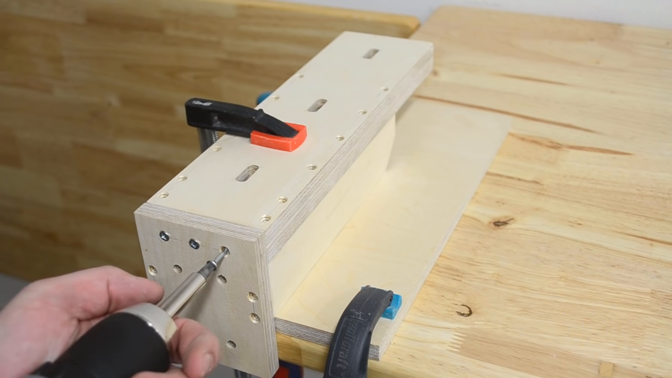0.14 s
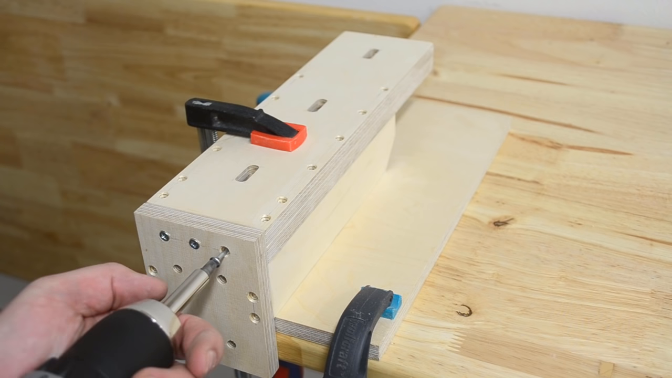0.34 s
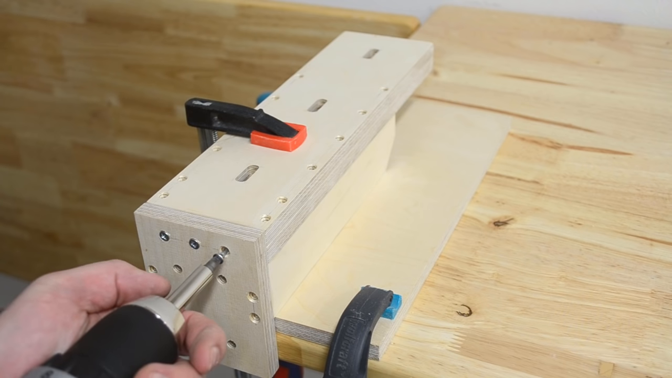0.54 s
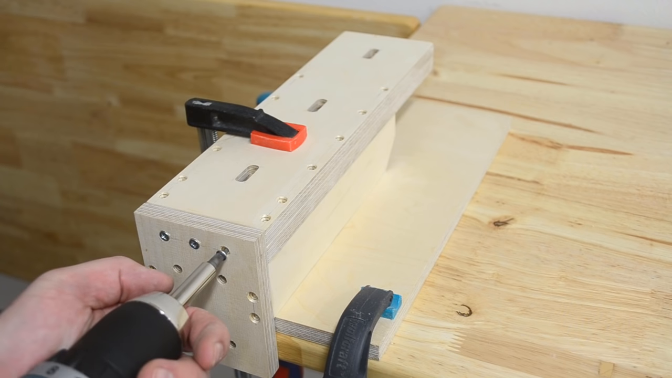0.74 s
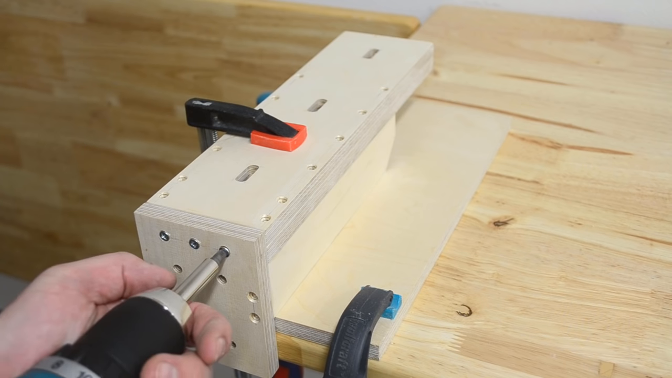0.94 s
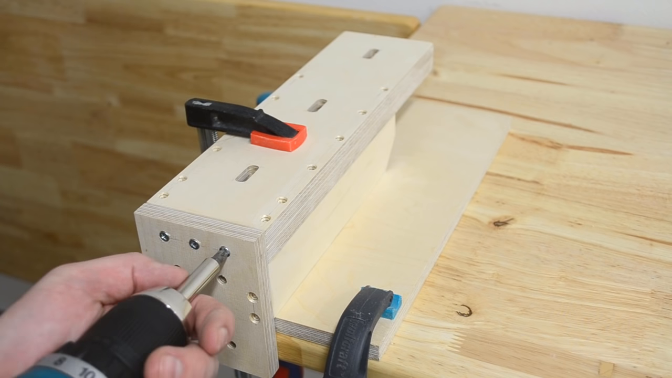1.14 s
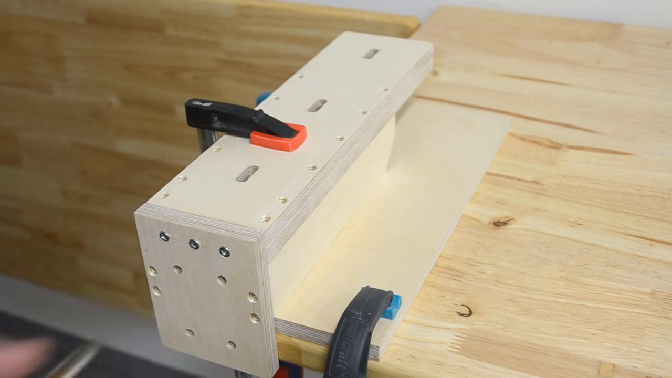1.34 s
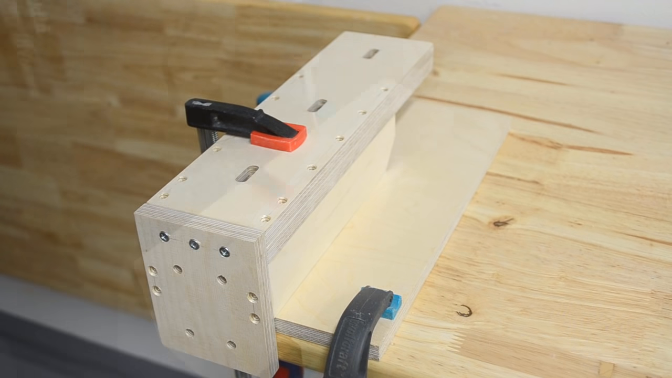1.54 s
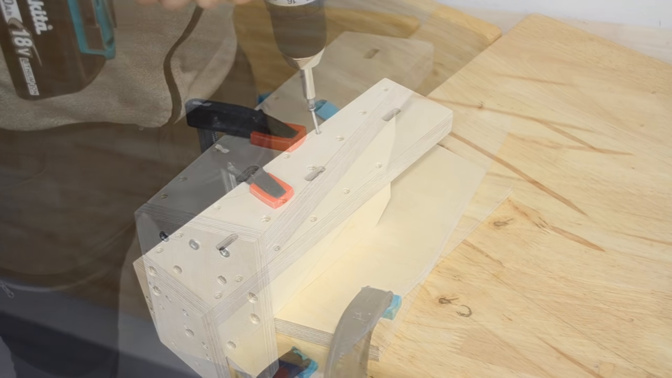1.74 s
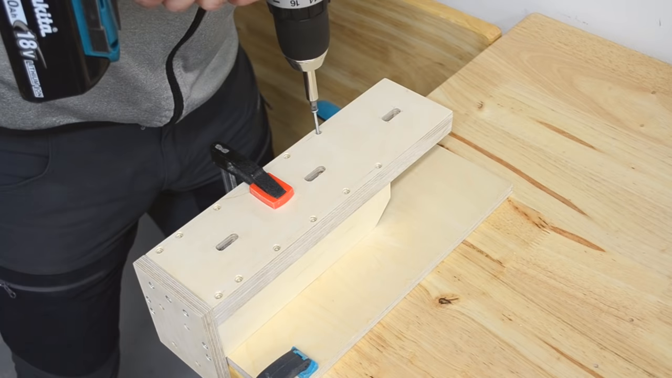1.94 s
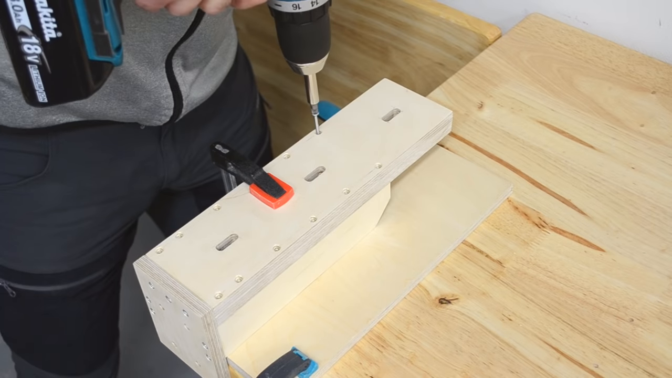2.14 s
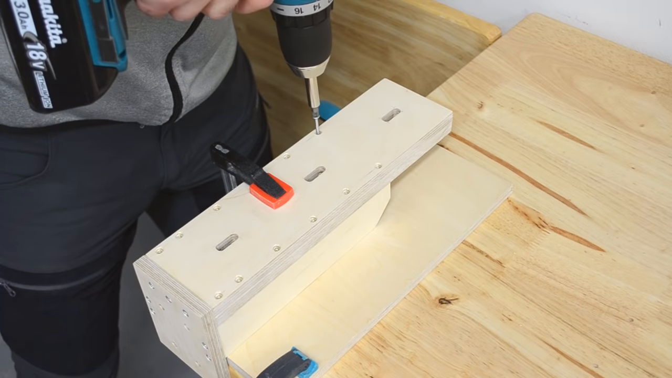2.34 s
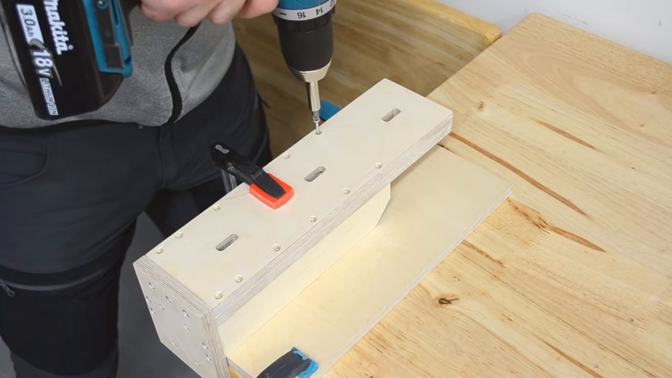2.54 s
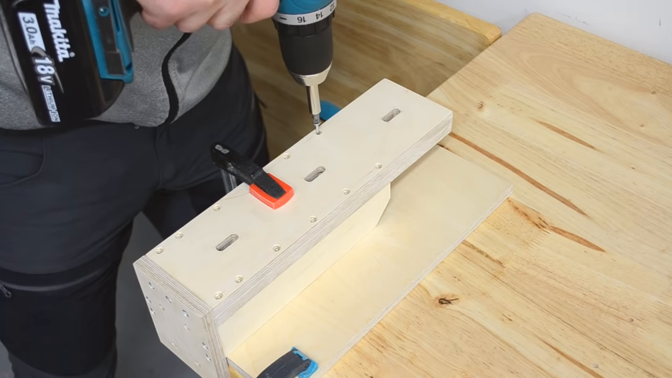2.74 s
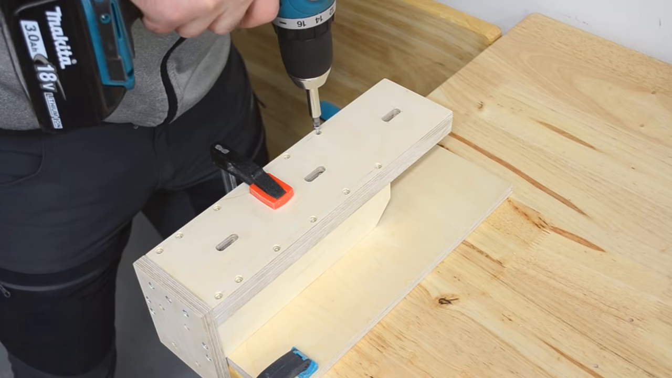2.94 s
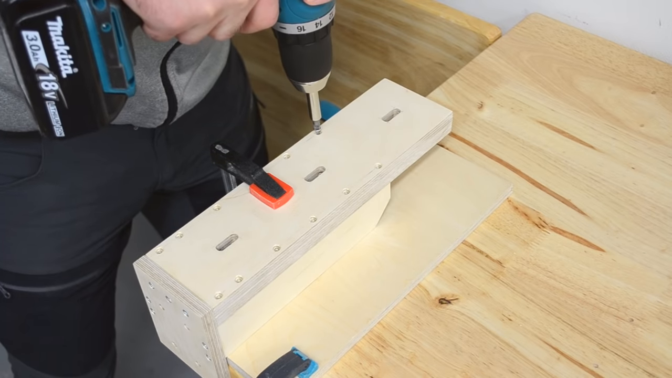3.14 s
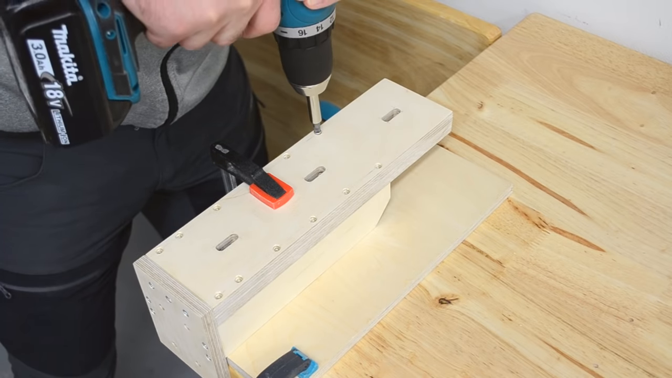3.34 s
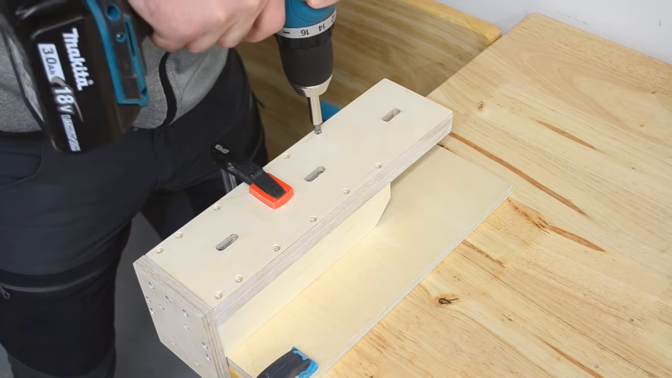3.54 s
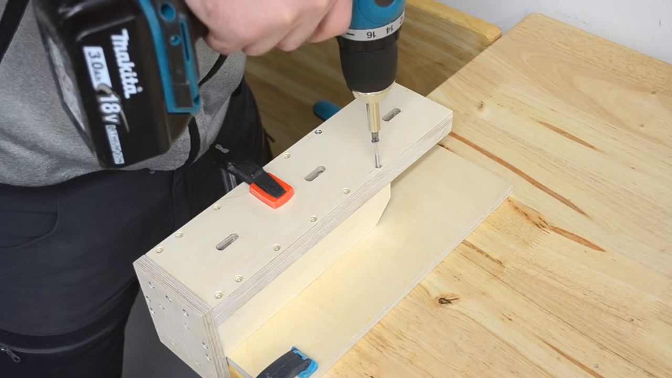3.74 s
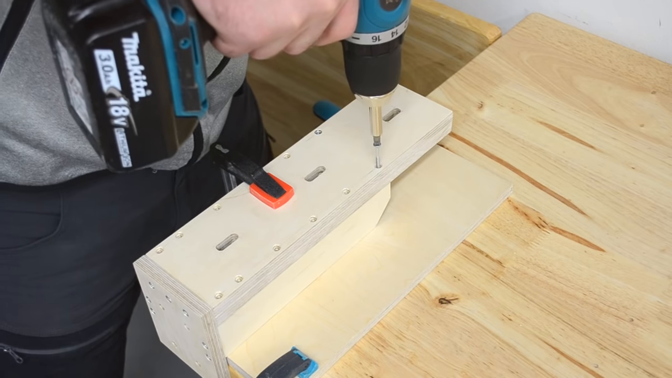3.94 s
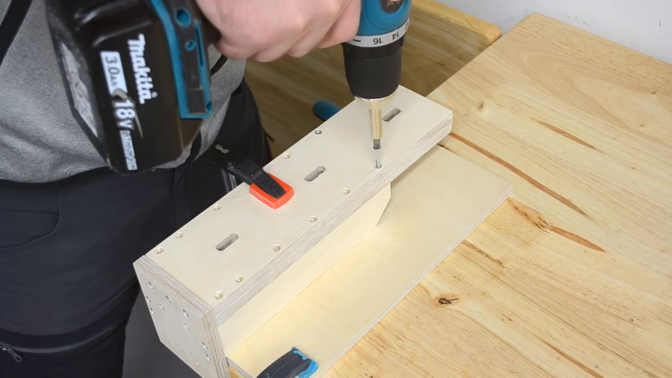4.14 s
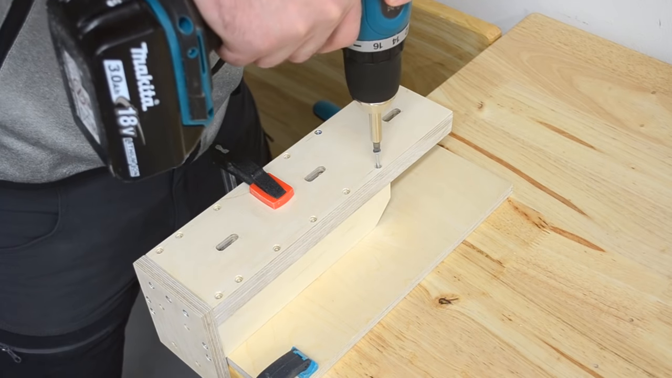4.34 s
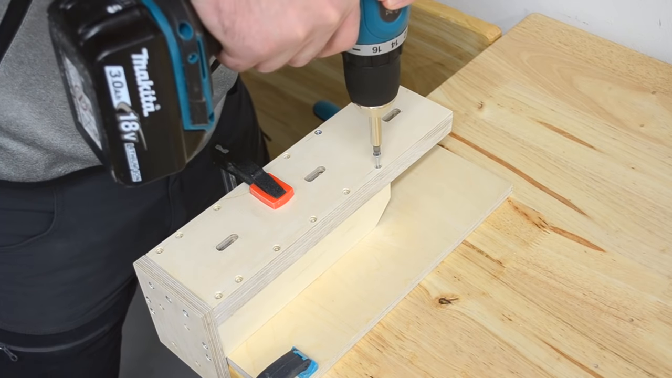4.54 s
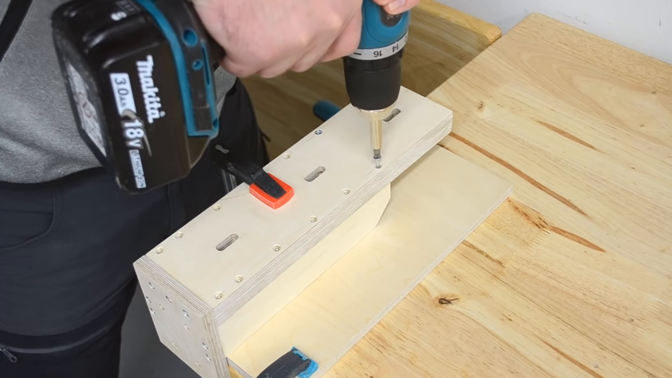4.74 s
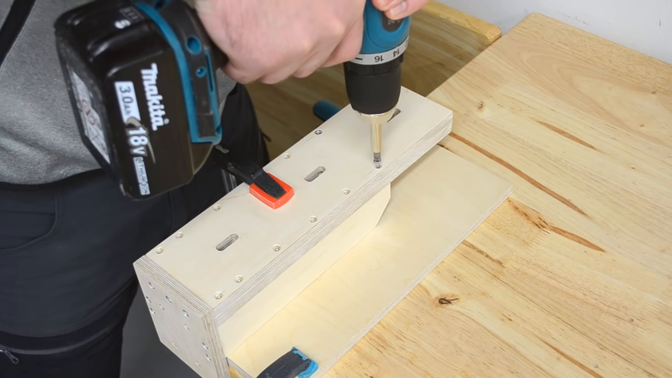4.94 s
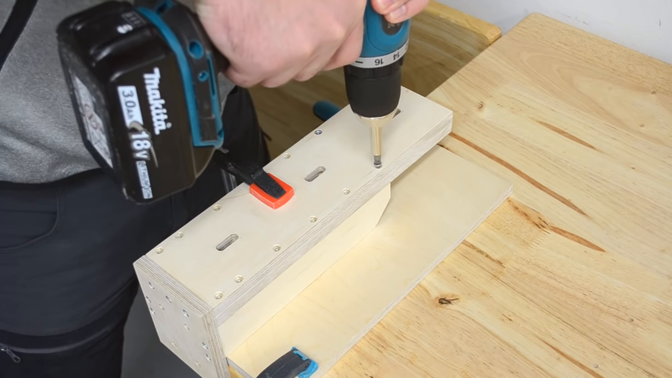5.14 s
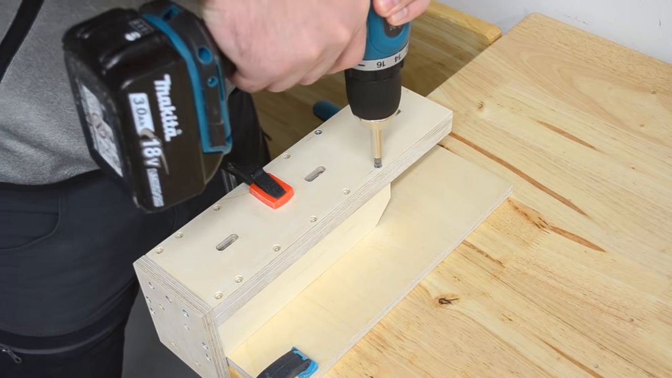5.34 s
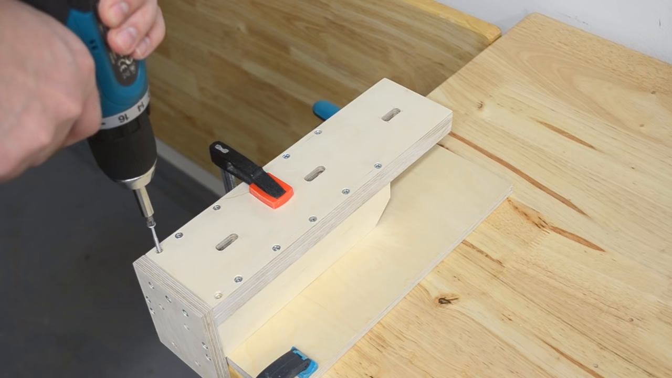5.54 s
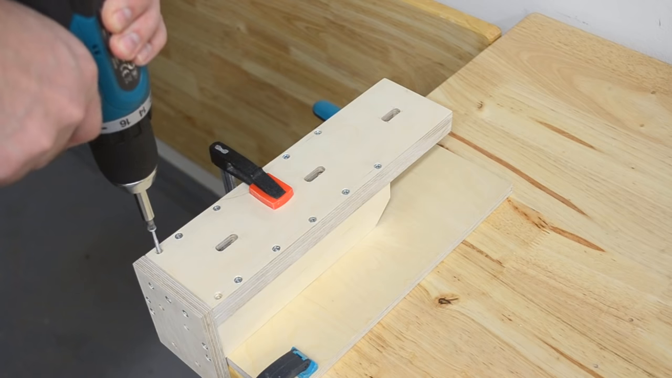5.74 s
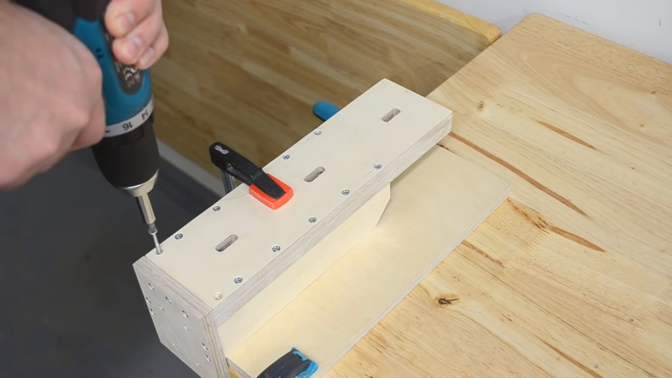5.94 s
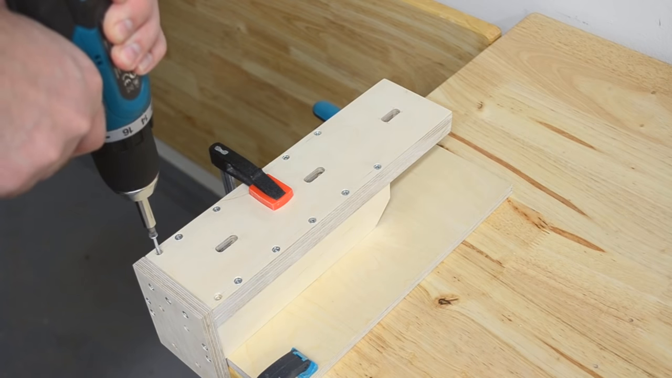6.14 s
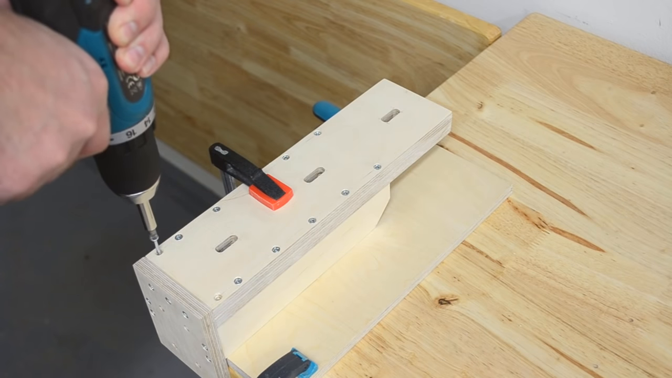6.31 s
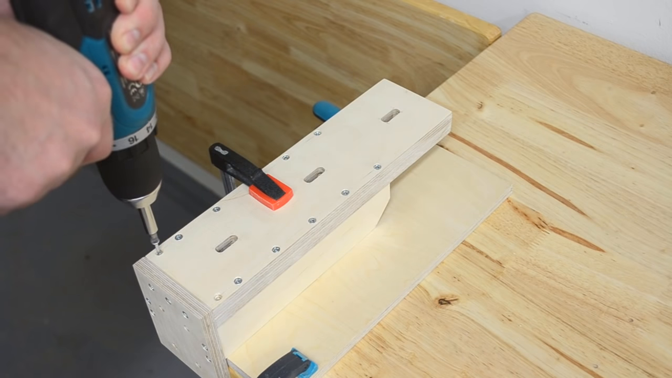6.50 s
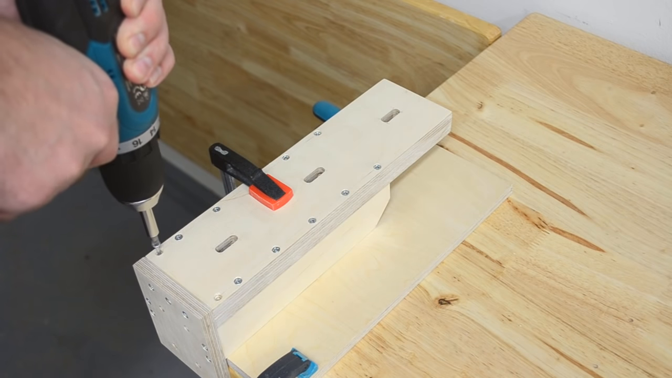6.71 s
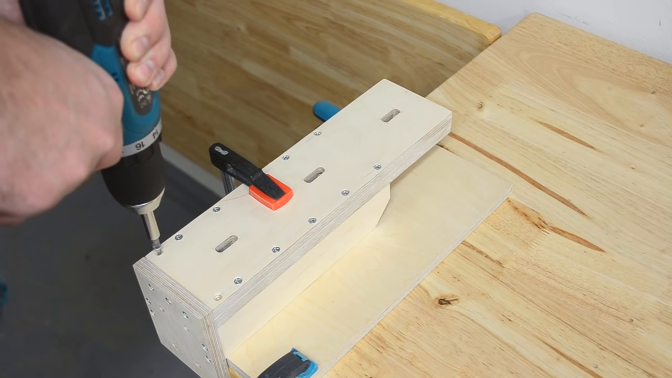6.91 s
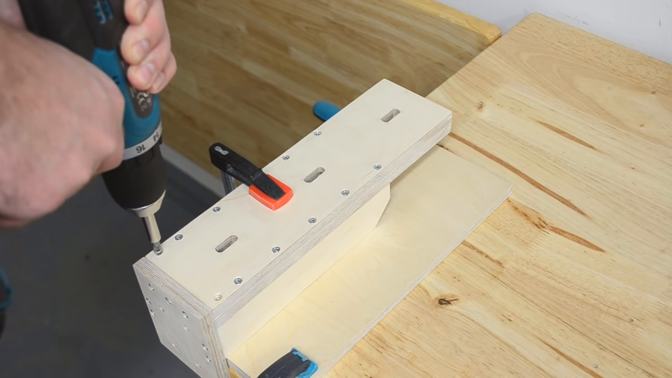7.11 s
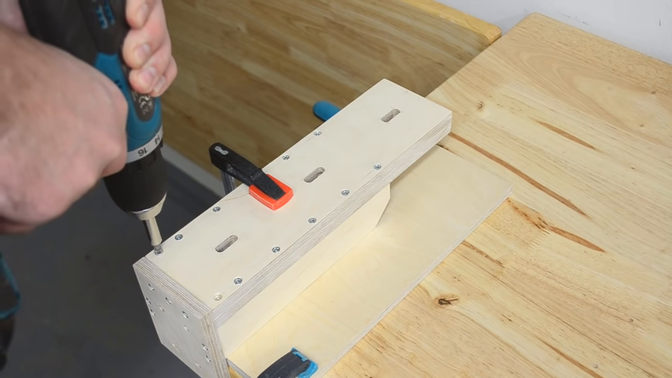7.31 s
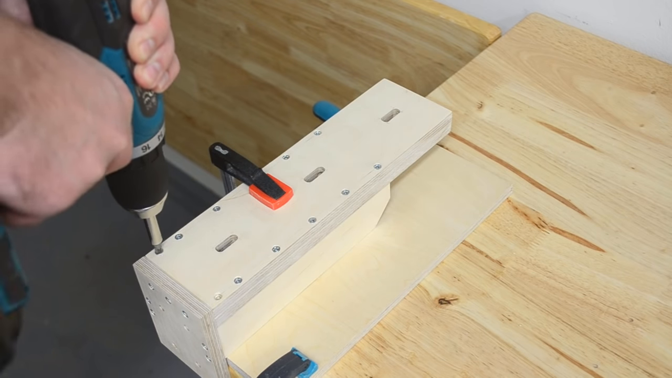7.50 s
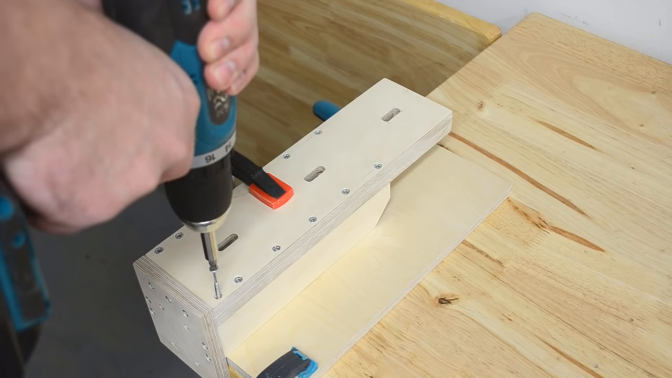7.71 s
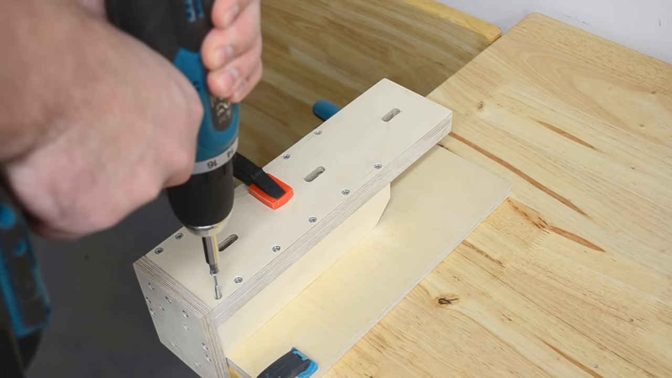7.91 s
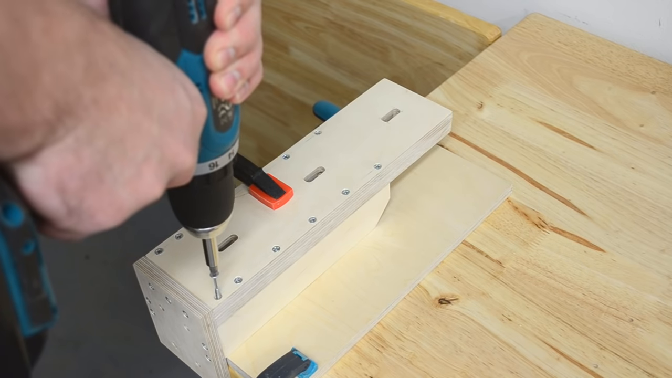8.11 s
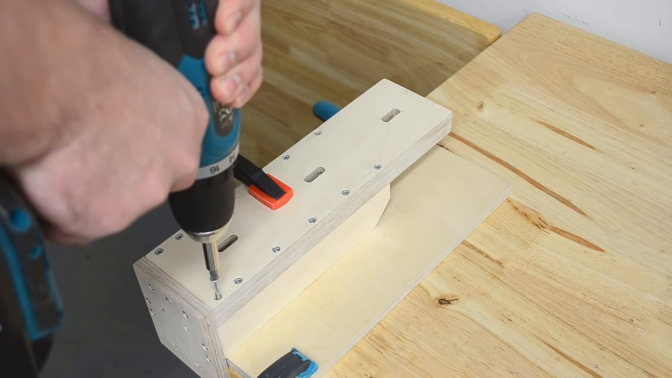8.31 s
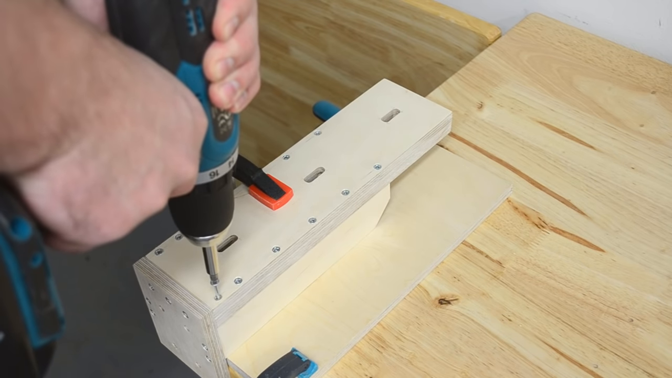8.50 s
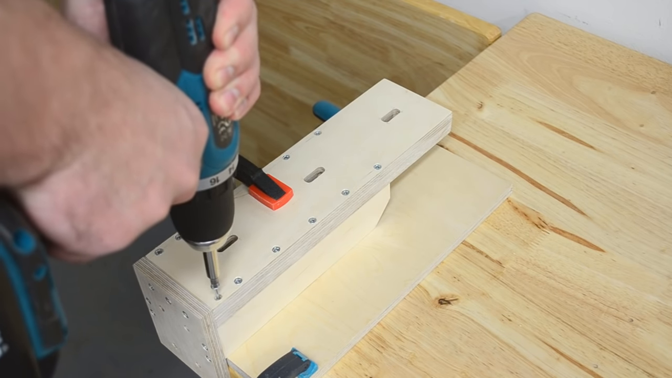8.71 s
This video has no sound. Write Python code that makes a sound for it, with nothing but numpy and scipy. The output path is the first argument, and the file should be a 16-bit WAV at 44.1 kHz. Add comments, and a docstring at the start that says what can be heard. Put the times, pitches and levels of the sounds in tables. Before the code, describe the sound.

Close drill bursts in a small workshop: gritty gear whine sagging under load, quick clacking clutch, short pauses and faint ticks of the bit.

```python
"""Cordless drill in a small workshop

From a metre away, in mono: five screws go into a clamped plywood box, the first already turning, the last cut off.
Noise gives the gear rattle and sines on multiples of the shaft speed give the whines; the speed sags under load.
Four drives end in clutch ratcheting, built of cracks and struck modes, before the drill stops.
Light ticks of handling fall in the first pause and in three later drives; the room adds a short tail over faint hiss."""
import sys
import numpy as np
from scipy import signal
from scipy.fft import rfft, irfft, next_fast_len
from scipy.io import wavfile
from scipy.ndimage import uniform_filter1d

SR = 44100
rng = np.random.default_rng(int(sys.argv[2]) if len(sys.argv) > 2 else 0)


def transcribe(signal):
    """Save signal, clipped to [-1, 1], as a 16-bit WAV file at the path in sys.argv[1]."""
    frames = np.atleast_2d(signal).T
    limited = np.clip(frames, -1, 1)
    pcm = np.round(limited * 32767).astype(np.int16)
    wavfile.write(sys.argv[1], SR, pcm)


N = 386316
TIME = np.arange(N) / SR
# clutch slips, in bursts for screws 1-4: [slip_s, crack_peak_db, ring_gain_db, knock_gain_db]
CLUTCH_SLIPS = [
    [(1.0349, -28, -39, -44), (1.0459, -30, -37, -44), (1.0562, -24, -37, -46), (1.0677, -25, -39, -46),
     (1.0722, -29, -46, -52), (1.0797, -27, -39, -47), (1.0911, -25, -39, -47), (1.1026, -25, -39, -47),
     (1.1151, -29, -39, -47), (1.1293, -29, -38, -46)],
    [(3.5169, -23, -38, -36), (3.5315, -24, -36, -38), (3.5489, -27, -35, -40), (3.57, -27, -35, -41),
     (3.5954, -31, -36, -43), (3.6383, -28.5, -38, -47)],
    [(5.4005, -25, -36, -37), (5.4112, -24, -36, -39), (5.4216, -26, -35, -41), (5.4321, -24, -34, -41),
     (5.4431, -24, -33, -39), (5.4553, -28, -33, -39)],
    [(7.4038, -25, -35, -39), (7.4183, -24, -36, -41), (7.4336, -27, -34, -42), (7.4507, -29, -33, -42),
     (7.4669, -28, -32, -43), (7.4873, -27, -32, -44), (7.5117, -28, -35, -46), (7.5507, -28, -33, -45)],
]


def undb(db):
    """Decibels to gain."""
    return 10 ** (np.asarray(db) / 20)


def level(x, db):
    """Scale to an rms level."""
    return x * undb(db) / np.sqrt(np.mean(x ** 2))


def spectrum_db(hz, table):
    """Read a (Hz, dB) spectrum; it falls 12 dB per octave under its first point."""
    at_hz, db = np.transpose(table)
    octaves_under = np.log2(np.maximum(at_hz[0] / hz, 1))
    return np.interp(np.log(hz), np.log(at_hz), db) - 12 * octaves_under


def lift_db(hz, lifts):
    """Summed lift of (Hz, width Hz, dB) resonances."""
    return sum(db / (1 + (2 * (hz - f) / w) ** 2) for f, w, db in lifts)


def colour(x, table, lifts=()):
    """Shape by a (Hz, dB) spectrum, lifted at (Hz, width Hz, dB) resonances."""
    size = next_fast_len(len(x))
    hz = np.maximum(np.arange(size // 2 + 1) * SR / size, 1)
    gain = undb(spectrum_db(hz, table) + lift_db(hz, lifts))
    return irfft(rfft(x, size) * gain, size)[:len(x)]


def walk(rate, size):
    """Random levels held 1 / rate s and slewed twice; spread near 1."""
    k = int(SR / rate)
    steps = np.repeat(rng.standard_normal(size // k + 1), k)
    return 1.2 * uniform_filter1d(uniform_filter1d(steps, k), k)[:size]


def column(table, k):
    """Leading columns of each row, with entry k of its last five."""
    return [(*row[:-5], row[k - 5]) for row in table]


def shop():
    """Faint workshop hiss: coloured noise, slowly wavering in level."""
    # hiss of the workshop: [frequency_hz, density_db_per_hz]
    hiss_spectrum = [(24, -49), (40, -6), (524, -7), (666, -5), (1960, -4), (12500, -7), (13200, -35)]
    hiss = level(colour(rng.standard_normal(N), hiss_spectrum), -86.5)
    return hiss * undb(walk(1.7, N))


def room(x):
    """Near walls: a short noisy tail, duller as it fades."""
    tail_db, dull_t60_s, bright_decay_s = -9, 0.16, 0.085
    t = TIME[:SR // 2]
    tail = rng.standard_normal(len(t)) * 1000. ** (-t / dull_t60_s) * (t > .004)
    dull = signal.lfilter([.5], [1, -.5], tail)
    # the unfiltered part dies sooner
    tail = tail * np.exp(-t / bright_decay_s) + dull
    unit_tail = tail / np.sqrt(np.sum(tail ** 2))
    return x + undb(tail_db) * signal.fftconvolve(x, unit_tail)[:N]


def ringing(table, t):
    """Modes (Hz, t60 s, dB) struck at once, each a little different every time."""
    out = 0
    for f, t60, db in table:
        gain = undb(db + 1.5 * rng.standard_normal())
        out = out + gain * np.sin(2 * np.pi * (f * t + rng.random())) * 1000. ** (-t / t60)
    return out


def blow(crack_db, ring_db, knock_db, k):
    """A sharp crack, the ringing housing with its dense tail, the knock of the box and a dull jolt of the bench."""
    # modes of the clutch housing: [frequency_hz, t60_s, burst_1_db .. burst_4_db, ticks_db]
    housing_modes = [(2885, .1, -6, -10, -5, -12, -8), (3014, .09, -9, -3, -8, -11, -9),
                     (3145, .09, -5, -8, -5, -7, -10), (3330, .12, -11, -9, -7, -7, -7),
                     (3610, .1, -10, -10, -5, -8, -9), (3800, .08, -10, -12, -8, -4, -9),
                     (3930, .09, -6, -10, -7, -8, -4), (4095, .11, -9, -4, -4, -9, -12),
                     (4790, .1, -10, -8, -10, -14, -14)]
    # modes of the box under a blow: [frequency_hz, t60_s, burst_1_db .. burst_4_db, ticks_db]
    box_modes = [(428, .17, -15, -22, -22, -22, -20), (516, .12, -20, -16, -16, -18, -20),
                 (818, .1, -16, -8, -4, -14, -14), (965, .12, -9, -8, -10, -6, -14),
                 (1240, .17, -13, -6, -8, -8, 2), (1400, .12, -4, 0, 0, -6, -12),
                 (1636, .11, -8, -2, -4, -2, -14), (1970, .1, -6, -8, -5, 0, -12),
                 (2075, .12, -3, -12, -12, -8, -14), (2300, .09, -2, -6, -10, 0, -12)]
    t = TIME[:SR // 3]
    crack = colour(rng.standard_normal(len(t)), [(2000, -9), (4000, -3), (15000, -8)]) * np.exp(-t / .0012)
    dense_spectrum = [(300, -24), (800, -17), (1500, -10), (2400, -12), (3000, 1.5), (4200, 0.5),
                      (5000, -7.5), (15000, -19.5)]  # Hz, dB
    dense = level(colour(rng.standard_normal(len(t)), dense_spectrum), -6.5) * 1000. ** (-t / 0.13)
    jolt = np.sin(2 * np.pi * 45 * t) * np.exp(-t / 0.0054)
    ring = 0.3 * ringing(column(housing_modes, k), t) + dense
    knock = 0.3 * ringing(column(box_modes, k), t) + undb(-31) * jolt
    body = undb(ring_db) * ring + undb(knock_db) * knock
    onset = np.minimum(t / 0.0015, 1)
    return undb(crack_db) * crack / np.abs(crack).max() + body * onset


def blows():
    """Clutch slips and handling ticks, each a fresh blow at its moment."""
    # bit and hand ticking on screw and box: [tick_s, crack_peak_db, ring_gain_db, knock_gain_db]
    ticks = [(1.3102, -58, -68, -72), (1.3143, -54, -73, -65), (1.386, -67, -84, -95),
             (1.4749, -65, -80, -88), (2.212, -37, -52, -66), (4.168, -43, -49, -54),
             (8.138, -44, -54, -59)]
    out = np.zeros(N + SR)
    for k, rows in enumerate(CLUTCH_SLIPS + [ticks]):
        for s, *dbs in rows:
            hit = blow(*dbs, k)
            first = int(s * SR)
            out[first:first + len(hit)] += hit
    return out[:N]


def whine(turns, order, db, waver_db=3.0, rate=45):
    """A tone on a multiple of the turns, wavering in level; a quick waver blurs it."""
    gain = np.sqrt(2) * undb(db + waver_db * walk(rate, len(turns)))
    return gain * np.sin(2 * np.pi * (order * turns + rng.random()))


def brush_hiss(t, start, stall_db):
    """The motor brushes hiss at the top from the trigger on, fading as the motor stalls."""
    # hiss of the brushes: [frequency_hz, density_db_per_hz]
    brush_spectrum = [(8000, -30), (10500, -3), (13000, 0), (16000, -6)]
    hiss = level(colour(rng.standard_normal(len(t)), brush_spectrum), -60)
    return hiss * undb(stall_db) * np.minimum((t - start) / .04, 1)


def controller_buzz(t, start, place, lifts):
    """The speed controller buzzes at a fixed rate whatever the load, hardest just after the trigger."""
    buzz_hz, kick_db, kick_s = 332.4, 2.5, .12
    # multiples 1, 2, .. of the buzz, ahead of the colour of the place: [level_db]
    multiple_levels = [-71, -75, -71, -71, -75, -74, -79, -78]
    kick = kick_db * np.exp((start - t) / kick_s)
    out = 0
    for k, db in enumerate(multiple_levels, 1):
        body_db = spectrum_db(k * buzz_hz, place) + .4 * lift_db(k * buzz_hz, lifts)
        out = out + whine(buzz_hz * t, k, db + body_db + kick)
    return out


def trigger(t, row):
    """Shaft speed and rattle level of one pull: spin-up, full pull, sag with depth, stall as the head seats."""
    start_hz, spin_up_s, creep_hz_per_s, pull_s, sag_s = 117, .04, 11, .05, .55
    stall_hz, knee_s = 100, .01
    start_db, seat_db, seat_delay_s, surge_s, coast_db_per_hz = -16, 5.5, .062, .045, .36
    # the hand leans harder or eases, and the fully pulled speed follows: [time_s, speed_change_hz]
    lean = [(.25, 0), (.59, -4), (.63, 1.5), (5.9, 0), (6.04, 2.5), (6.22, 0.2), (6.55, 3.6), (6.78, 0)]
    start, part_hz, full_s, full_hz, sag_hz, seat, release, stop, rattle_db, swell_s, depth_db, *_, brake = row
    part = part_hz - (part_hz - start_hz) * np.exp((start - t) / spin_up_s) + creep_hz_per_s * (t - start)
    sag = sag_hz * (1 - np.exp(np.minimum(full_s - t, 0) / sag_s))
    full = full_hz - sag + np.interp(t, *np.transpose(lean))
    free = part + (full - part) * np.clip((t - full_s) / pull_s + .5, 0, 1)
    # braking sets in over a soft knee
    braking = brake * knee_s * np.logaddexp(0, (t - seat) / knee_s)
    hz = np.maximum(free - braking, stall_hz / 2)
    db = rattle_db + start_db * np.exp((start - t) / swell_s) + depth_db * (t - start)
    # the rattle surges just after the head seats, then falls once the trigger is released
    db = db + seat_db * np.clip((t - seat - seat_delay_s) / surge_s + 1, 0, 1)
    coast_hz_per_s = (full_hz - sag_hz - stall_hz) / (stop - seat)
    db = db - coast_db_per_hz * coast_hz_per_s * np.maximum(t - release, 0)
    return hz, db


def gear_rattle(turns, depth, stall_db, place, lifts):
    """Gear teeth as bursty noise throbbing once a shaft turn; a deeper screw drives the box resonances harder."""
    size = len(turns)
    throb = 1 + .15 * np.cos(2 * np.pi * turns)
    teeth = rng.standard_normal(size) * undb(1.5 * rng.exponential(size=size)) * throb
    # shares of the box resonances at the start and the end of the drive
    shallow, deep = (colour(teeth, place, [(f, w, share * db) for f, w, db in lifts]) for share in (.6, 1.2))
    out = level(shallow + depth * (deep - shallow), -1.28) * undb(0.53 * walk(10.92, size))
    # slower teeth knock more dully
    dull = uniform_filter1d(out, size=5)
    return dull + undb(stall_db) * (out - dull)


def motor_whines(turns, whines, tone_db, pulse_db, depth):
    """Motor and gear tones on multiples of the shaft speed; loose planet gears blur the middle ones."""
    load_growth_db = 9
    # multiples of the shaft speed: [order]
    orders = (6, 7.56, 8.21, 15, 32, 45, 46, 66, 74)
    out = 0
    for k, (db,) in zip(orders, whines):
        loose = 20 < k < 40
        # low tones pulse once a chuck turn and grow with depth, but the lowest fades instead
        load_db = (pulse_db + np.sign(k - 7) * load_growth_db * (depth - .7)) * (k < 20)
        waver_db, rate = (7.5, 260) if loose else (2.2, 45)
        out = out + whine(turns, k, db + tone_db + load_db, waver_db=waver_db, rate=rate)
    return out


def gear_squeal(t, turns, hz, row, tone_db, pulse_db):
    """The last gear squeals, loudest near a resonance, and weakens as the head nears the wood."""
    order, resonance_hz, width_hz, build_s, floor_db = 6.91, 1372, 38, .14, -25.5
    fade_db, fade_s = -9, .22
    seat, peak_db, squeal_s = row[5], row[11], row[12]
    resonance = undb(peak_db) / np.hypot(1, (2 * (order * hz - resonance_hz) / width_hz) ** 2)
    build = np.clip((t - squeal_s) / build_s, 0, 1)
    squeal_db = 20 * np.log10(undb(floor_db) + build * resonance)
    fade = fade_db * np.clip((t - seat) / fade_s + 1, 0, 1)
    return whine(turns, order, squeal_db + tone_db + fade + pulse_db, waver_db=1.4)


def take_up_whine(t, turns, full_s, db):
    return whine(turns, 10.55, db, waver_db=2.1, rate=20) * np.clip((full_s - t) / .15, 0, 1)


def screw(row, place, whines, runout, lifts, take_up_db, slip_s):
    """One trigger pull: the shaft turns drive rattle, whines and squeal, with controller buzz and brush hiss."""
    chuck_ratio, pulse_depth_db, let_go_s = 18.4, 5.5, .03
    start, _, full_s, *_, seat, _, stop, _, _, _, _, _, _ = row
    first = max(int(start * SR), 0)
    t = TIME[first:int(stop * SR)]
    hz, rattle_db = trigger(t, row)
    depth = (t - start) / (stop - start)
    chuck = 2 * np.pi * np.cumsum(hz) / SR / chuck_ratio
    chuck = chuck - np.interp(seat, t, chuck)  # counted from the seating head, or from the end if cut off
    wobble, wobble_phase, pulse_phase = runout
    pulse_db = pulse_depth_db * depth * np.cos(chuck + pulse_phase)
    # the load is uneven, so the speed trembles and the high whines smear most
    tremble = wobble * depth * np.cos(chuck + wobble_phase) + .003 * walk(70, len(t))
    turns = np.cumsum(hz * (1 + tremble)) / SR
    # tones need load on the gears at the start, die away as the motor stalls and end as the clutch lets go
    stall_db = 70 * np.minimum(np.log10(hz / np.maximum.accumulate(hz) / .92), 0)
    let_go_db = -20 * np.clip((t - slip_s) / let_go_s + 1, 0, 2)
    tone_db = .8 * np.minimum(rattle_db + 50, 0) + stall_db + let_go_db
    out = gear_rattle(turns, depth, stall_db, place, lifts)
    out = out + motor_whines(turns, whines, tone_db, pulse_db, depth)
    out = out + gear_squeal(t, turns, hz, row, tone_db, pulse_db)
    out = out + take_up_whine(t, turns, full_s, take_up_db)
    out = out * undb(rattle_db) + controller_buzz(t, start, place, lifts) + brush_hiss(t, start, stall_db)
    return np.pad(out, (first, N - first - len(t)))


def scene():
    """Drill and blows in the room over the workshop hiss, alike in both channels."""
    # one row a screw: [trigger_s, part_pull_speed_hz, full_pull_s, full_speed_hz, load_sag_hz, head_seats_s,
    #  release_s, stop_s, rattle_db, rattle_swell_s, depth_growth_db_per_s, squeal_peak_db (over the rattle),
    #  squeal_start_s, seating_brake_hz_per_s]
    screws = [(-0.7, 150, -0.5, 180, 2.5, 1.01, 1.115, 1.145, -49.3, .1, 2.8, -14, .1, 350),
              (1.765, 137, 2.04, 207.5, 12, 3.45, 3.52, 3.645, -48.5, .17, 2.2, -10.5, 2.44, 490),
              (3.732, 135, 3.835, 213.5, 16, 5.36, 5.465, 5.475, -49, .075, 2.2, -7, 4.42, 400),
              (5.609, 165.5, 5.885, 195, 15.5, 7.325, 7.425, 7.56, -49.3, .085, 3.8, -14, 6.4, 540),
              (7.763, 175.5, 8.118, 209, 7, 9.5, 9.6, 9.7, -47.8, .14, 2.5, -16, 8.6, 500)]
    # colour of the rattle at each place on the box: [frequency_hz, screw_1_db_per_hz .. screw_5_db_per_hz]
    places = [(205, -52, -45.0, -45, -43.0, -38), (347, -34, -23, -26, -32.5, -34.5),
              (666, -21.5, -25, -24, -30.5, -31.5), (839, -21, -9.5, -10.5, -14, -11.5),
              (1350, -11, -10.5, -11, -12.5, -11), (2340, -4.5, -7, -7, -8.0, -7.0),
              (3200, -5.5, -4.5, -4, -4.5, -3), (4870, -1.5, -4, -4.5, -4.5, -5.5),
              (8400, 1, -3, -3, -4.0, -4.5), (9300, -4.5, -4.0, -3.5, -5.5, -7.5),
              (13000, -3.5, 1, 1, 2, 1.5), (15400, -2, -4.0, -7.5, -12.5, -4.5),
              (15900, -20, -8.5, -9.0, -11.0, -6)]
    # resonances of box and housing: [frequency_hz, width_hz, screw_1_lift_db .. screw_5_lift_db]
    box = [(356, 44, 2, 7, 7, 1.8, 2), (516, 56, 3.7, 7.7, 10, 7.7, 15.4), (842, 25, 4, 9.4, 8, 12, 4.8),
           (1000, 14, 3, 5.2, 9.8, 18, 4.4), (1342, 89, 9.5, 8.1, 11, 4.3, 5.4),
           (1630, 36, 3.3, 8, 11, 5, 2.5), (1965, 60, 3, 7.3, 8, 9.1, 3.9), (2650, 40, 7, 1.1, 1, 1, 1),
           (3200, 110, 6, 1.5, 1.5, 1.5, 3), (4040, 110, 1.2, 4.5, 5, 7, 3)]
    # motor whines over the rattle, a row for each multiple of the shaft speed: [screw_1_db .. screw_5_db]
    whine_levels = [(-50, -27, -25, -48, -30), (-22, -45, -45, -45, -45), (-34, -30, -27, -26.5, -36.5),
                    (-22, -21, -24, -29, -28), (-24.5, -21, -22, -26, -27), (-28, -11.5, -11.5, -15, -11),
                    (-22, -18, -28.5, -20.5, -24), (-13, -9.5, -9, -10.5, -11),
                    (-14.5, -15, -22, -9.5, -23)]
    # each screw runs a little out of true, once a chuck turn: [speed_share, speed_phase_rad, pulse_phase_rad]
    runouts = [(0.003, 3, 3.5), (0.003, -2.5, -1.96), (0.008, .4, .88), (0.008, -.85, -.35),
               (0.002, -0.9, 4)]
    # take-up whine over the rattle for screws 1-5: [level_db]
    take_up_levels = [-40, -14, -24, -24, -28]
    first_slips = [rows[0][0] for rows in CLUTCH_SLIPS] + [np.inf]  # the fifth never slips
    drill = np.zeros(N)
    for k, row in enumerate(screws):
        drill += screw(row, column(places, k), column(whine_levels, k), runouts[k], column(box, k),
                       take_up_levels[k], first_slips[k])
    return np.tile(room(drill + blows()) + shop(), (2, 1))


def record(dry):
    """The small microphone thins the bass under 250 Hz; the top is cut steeply at 15830 Hz."""
    thin = signal.sosfilt(signal.butter(1, 250, "high", fs=SR, output="sos"), dry)
    return signal.sosfilt(signal.ellip(10, .2, 70, 15830, fs=SR, output="sos"), thin)


dry = scene()
out = record(dry)
transcribe(out)
```